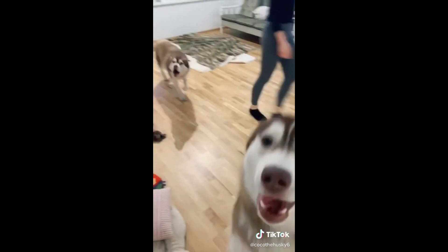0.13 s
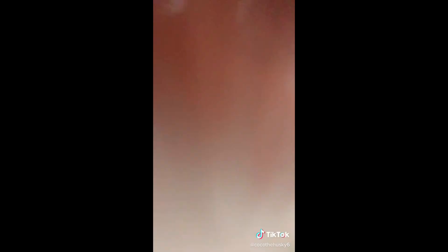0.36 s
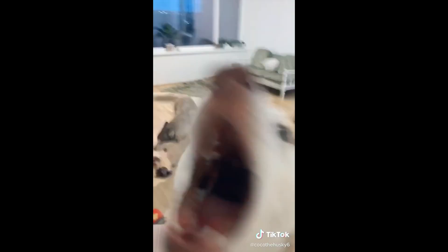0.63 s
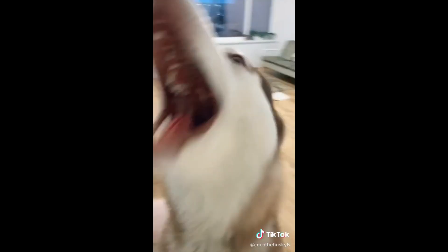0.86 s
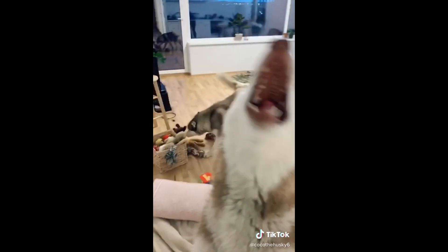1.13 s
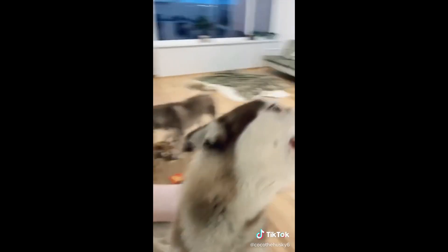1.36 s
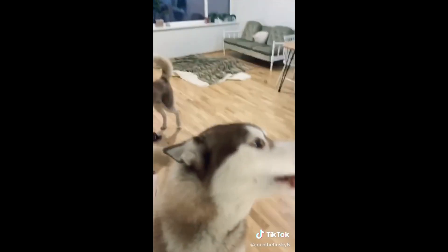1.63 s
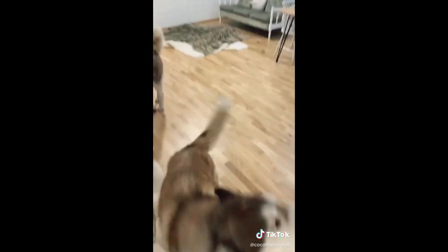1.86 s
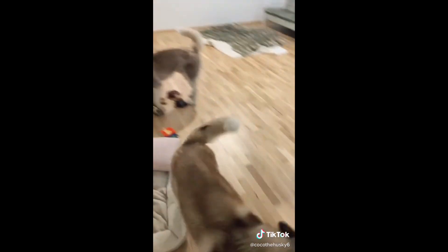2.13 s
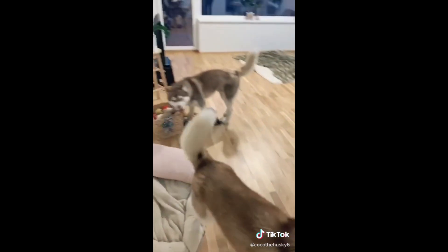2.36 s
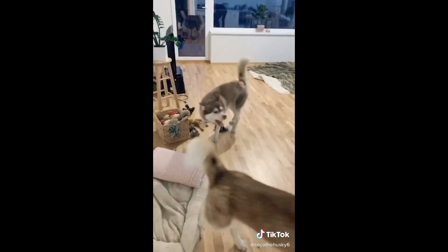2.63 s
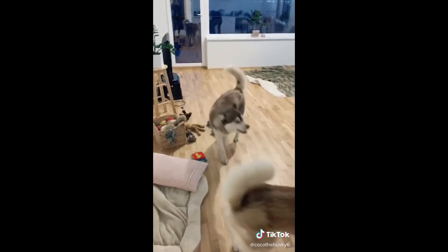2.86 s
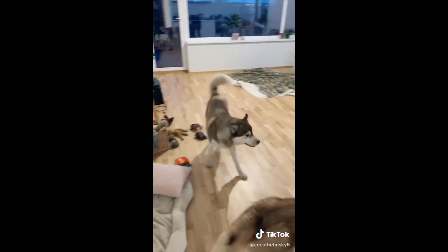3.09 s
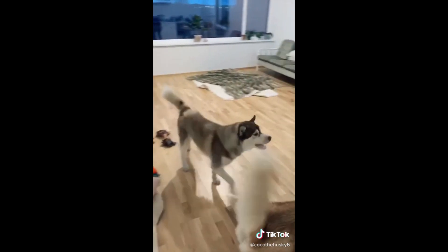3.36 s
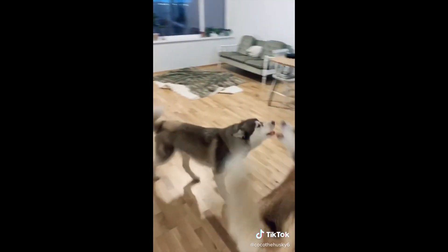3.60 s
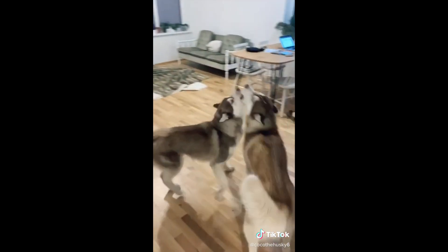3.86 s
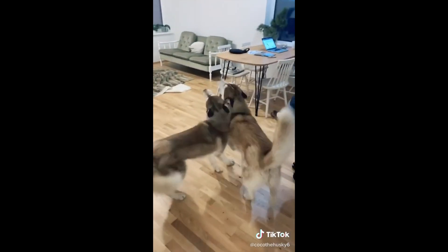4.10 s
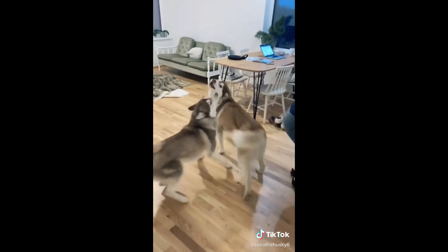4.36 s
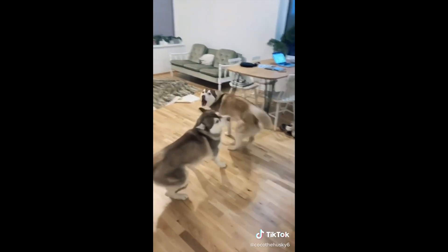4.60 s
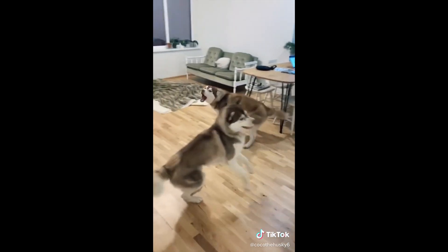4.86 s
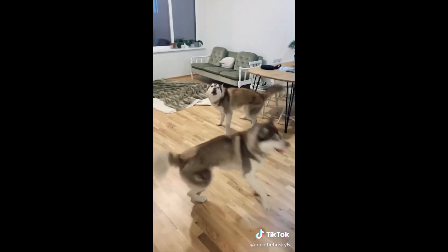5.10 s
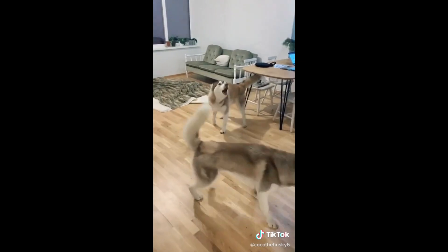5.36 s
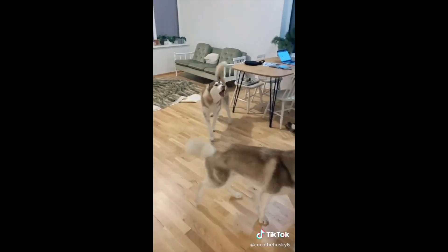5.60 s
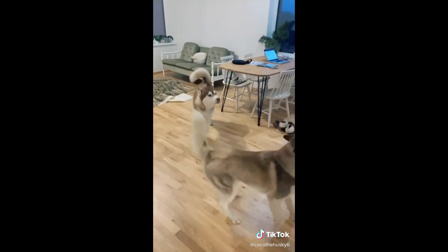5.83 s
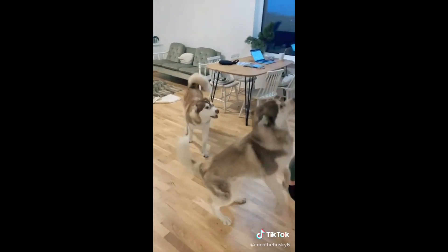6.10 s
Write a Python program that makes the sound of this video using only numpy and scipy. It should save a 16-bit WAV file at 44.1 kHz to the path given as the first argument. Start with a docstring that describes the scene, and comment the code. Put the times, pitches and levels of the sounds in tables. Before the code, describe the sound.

Excited huskies trade wavering howls and hoarse barks indoors; an early bark is close and distorted, the later calls farther and more echoing.

```python
"""Clean, wavering howls from huskies overlap in a living room; each is a stack of harmonics shaped by a moving mouth.
Under them runs a hoarse chorus of barks and growls: irregular pulses through throat resonances, with hissing breath.
An early close bark puffs on the phone's microphone ports and the loudest peaks clip; most later calls are farther.
The walls smear howls and barks with a decaying noise tail, and a faint rumble lies beneath."""
import sys
import numpy as np
from scipy import signal
from scipy.fft import rfft, irfft, next_fast_len
from scipy.io import wavfile
from scipy.ndimage import uniform_filter1d, map_coordinates

SR = 44100
rng = np.random.default_rng(int(sys.argv[2]) if len(sys.argv) > 2 else 0)


def unload_wav(signal):
    """Save mono or channel-first audio to the path in sys.argv[1] as 16-bit WAV at rate SR, clipped to [-1, 1]."""
    wavfile.write(
        sys.argv[1],
        SR,
        np.round(np.clip(np.atleast_2d(signal).T, -1, 1) * 32767).astype(np.int16),
    )


def linear_from_db(decibels):
    """Turn decibels (scalar or array-like) into linear amplitude factors; 0 gives 1."""
    return 10 ** (np.asarray(decibels, float) / 20)


N = 274302  # length in samples

ROOM_AT_1M_DB = -13  # the room's level against the direct sound at 1 m; it grows with distance


def unit(x):
    """Scaled to rms 1."""
    return x / np.sqrt(np.mean(x ** 2) + 1e-20)


def along(points, hz):
    """Interpolates (Hz, value) points on a log frequency axis."""
    f, v = np.transpose(points)
    return np.interp(np.log(hz + 1), np.log(f + 1), v)


def curves(rows):
    """One value per sample for each column after the time."""
    s, *cols = np.transpose(rows)
    return [np.interp(np.arange(N) / SR, s, c) for c in cols]


def gate(rows, fade_s=.014):
    """1 from the first to the last time of a table, with soft edges outside."""
    t = np.arange(N) / SR
    inside_s = np.minimum(t - rows[0][0], rows[-1][0] - t)
    return np.clip(inside_s / fade_s + 1, 0, 1)


def wobble(rate, size=N):
    """A smooth random curve, rate knots a second."""
    knots = rng.standard_normal(int(size * rate / SR) + 4)
    return map_coordinates(knots, [np.arange(size) * rate / SR], order=2)


def filtered(x, response):
    """x times a response of frequency, zero-padded so that the end does not wrap onto the start."""
    m = next_fast_len(N + SR // 2)
    return irfft(rfft(x, m) * response(np.fft.rfftfreq(m, 1 / SR)), m)[..., :N]


def noise(spectrum, alike):
    """Stereo coloured noise of rms 1; alike is the correlation of the two sides."""
    a, b = filtered(rng.standard_normal((2, N)), lambda hz: linear_from_db(along(spectrum, hz)))
    u = np.arccos(np.clip(alike, -1, 1)) / 2
    left = np.cos(u) * a + np.sin(u) * b
    right = np.cos(u) * a - np.sin(u) * b
    return unit(np.array([left, right]))


def burst(start_s, length_s, attack_s, sag_db_per_s, fade_db_per_s):
    """A quick rise, a sagging hold, then a fade."""
    t = np.maximum(np.arange(N) / SR - start_s, 0)
    loss_db = sag_db_per_s * np.minimum(t, length_s) + fade_db_per_s * np.maximum(t - length_s, 0)
    return np.minimum(t / max(attack_s, 1e-3), 1) ** 2 * linear_from_db(-loss_db)


def room(x):
    """A different decaying noise tail reaches each port; each frequency dies at its own speed."""
    # decay of the walls' reverberation: (frequency [Hz], time to fall 60 dB [s])
    decay = [(400, 0.9), (3000, 0.58), (1e4, 0.095)]
    hz, t, z = signal.stft(rng.standard_normal((2, SR * 3 // 4)), SR, nperseg=256)
    decayed = z * linear_from_db(-60 * t / along(decay, hz)[:, None])
    tail = signal.istft(decayed, SR, nperseg=256)[1]
    late = np.pad(x, (250, 0))[None]  # samples before the tail sets in
    return signal.fftconvolve(late, tail / np.linalg.norm(tail[0]), axes=1)[:, :N]


def placed(x, room_db):
    """Direct sound plus the room's answer, scaled to keep the overall level."""
    return (x + linear_from_db(room_db) * room(x)) / np.sqrt(1 + linear_from_db(2 * room_db))


def rumble():
    """Faint handling and house rumble: low noise whose level drifts and wavers."""
    # colour of the rumble: (frequency [Hz], relative density [dB per Hz])
    colour = [(50, -10.5), (200, -9.5), (400, -76.5)]
    # course of the rumble, before it wavers: (time [s], level [dB])
    course = [(0, -62), (1.5, -79), (2.1, -67.5), (5.5, -69.5), (5.9, -63.5)]
    level_db = curves(course)[0] + 2.6 * wobble(3.8)
    return linear_from_db(level_db) * noise(colour, alike=0.45)


def puff():
    """The near dog's breath strikes the microphone ports: one burst of lumpy low noise, nearly alike on both."""
    # colour of the gust: (frequency [Hz], relative density [dB per Hz])
    colour = [(20, -47.5), (45, -1), (145, -5), (260, -12), (450, -79.5)]
    blow = linear_from_db(-24.5) * burst(.22, .15, attack_s=.019, sag_db_per_s=21, fade_db_per_s=167.5)
    lumpy = noise(colour, alike=0.99) * linear_from_db(2.2 * wobble(50))
    return blow * unit(lumpy)


def folds(pulse_hz, drift):
    """Uneven vocal-fold pulses, with air escaping once a cycle."""
    jitter, scatter_db, airy = .028, 3, .12  # fast pitch share, pulse height spread, air against pulses
    cycles = np.cumsum(pulse_hz * (1 + drift * wobble(7) + jitter * wobble(80))) / SR
    starts = np.flatnonzero(np.diff(np.floor(cycles)))
    pulses = np.zeros(N)
    pulses[starts] = linear_from_db(scatter_db * rng.standard_normal(N)[:len(starts)])
    air = unit(np.exp(-3 * (cycles % 1)) * rng.standard_normal(N))
    return (unit(pulses - pulses.mean()) + airy * air) * linear_from_db(4.5 * wobble(18))


def hoarse():
    """Barks and growls: rough pulses and a second, wandering voice ring the throat; breath hisses on top."""
    # barks and growls: (start [s], hold [s], starting pitch [Hz], throat level [dB], breath level [dB], distance [m])
    barks = [(-.02, 0.071, 356, -16, -44.5, 1.1), (0.238, 0.08, 328.1, -5, -31, 0.71),
             (0.382, 0.033, 332.5, -41, -29, 0.71), (0.455, 0.061, 317.7, -21, -48, 0.93),
             (1.668, 0.13, 303.4, -26.5, -60.5, 3.05), (1.92, 0.11, 328.6, -30.5, -58.5, 2.3),
             (2.075, 0.19, 350.3, -22, -54.5, 4.1), (2.768, 0.49, 284.5, -31.5, -56, 0.63),
             (3.393, 0.092, 312.3, -17.5, -55, 3.69), (3.658, 0.38, 502.5, -23.5, -54, 1.73),
             (4.066, 0.15, 262.2, -19, -58.5, 1.8), (4.39, 0.27, 285, -26, -50, 1.3),
             (4.823, 0.15, 296.9, -19.5, -48.5, 2.75), (5.206, 0.33, 323.7, -32.5, -57, 2.4),
             (5.816, 0.08, 320.4, -21.5, -57.5, 1.83), (6.175, .1, 377.4, -24.5, -49.5, 1.9)]
    # resonances of the throat: (centre [Hz], width [Hz], relative level [dB])
    resonances = [(592, 1034, 7), (1186, 480, 9.5), (1550, 144, 9), (2420, 149, 5)]
    # colour of the breath: (frequency [Hz], relative density [dB per Hz])
    breath_colour = [(2500, -26), (4000, -8.5), (5300, -17.5), (6500, -9), (9500, -14.5), (11500, -22),
                     (14000, -48)]
    attack_s_per_m, sag_db_per_s = 0.0087, 18  # barks rise more slowly from afar
    throat_fade_db_per_s, breath_fade_db_per_s = 350.5, 112  # loss after the hold
    droop_per_s = .3  # the starting pitch is divided by one plus this for each second
    edge_db, edge_grows = -14.5, 0.79  # throat treble of a full-scale bark; dB lost per dB of softer effort

    def shapes(fade):
        return np.array([burst(s, length, attack_s_per_m * far, sag_db_per_s, fade)
                         for s, length, *_, far in barks])

    def tract(f):
        """Parallel resonances of alternating sign."""
        return sum((-1) ** k * linear_from_db(db) * 1j * f * w / (c * c - f * f + 1j * f * w)
                   for k, (c, w, db) in enumerate(resonances))

    def above(f, edge_hz):
        return 1 / (1 + (edge_hz / (f + 1)) ** 8)

    start_s, _, pitch_hz, throat_db, breath_db, distance_m = np.array(barks).T
    t = np.arange(N) / SR
    latest = np.searchsorted(start_s, t).clip(1) - 1  # the bark begun last
    latest_hz = pitch_hz[latest] / (1 + droop_per_s * (t - start_s[latest]))

    # farther barks give more of their level to the room
    wet = linear_from_db(ROOM_AT_1M_DB) * distance_m
    gains = linear_from_db(throat_db) * np.array([np.ones_like(wet), wet]) / np.hypot(1, wet)
    direct_gain, room_gain = np.sqrt(gains ** 2 @ shapes(throat_fade_db_per_s) ** 2)
    breath_power = linear_from_db(2 * breath_db) @ shapes(breath_fade_db_per_s) ** 2
    breath_gain = uniform_filter1d(np.sqrt(breath_power), size=SR // 40)

    voices = folds(latest_hz, drift=.065) + linear_from_db(-3) * folds(490, drift=.15)
    pulses = filtered(voices, lambda f: tract(f) * above(f, 304.0))
    body = unit(filtered(pulses, lambda f: 1 - above(f, 2385)))
    edge = unit(filtered(pulses, lambda f: above(f, 2100) * linear_from_db(along(breath_colour, f) / 2)))
    throat = body + linear_from_db(edge_db + edge_grows * throat_db[latest]) * edge
    breath = breath_gain * linear_from_db(1.8 * wobble(16)) * noise(breath_colour, alike=0.32)
    return direct_gain * throat + room(room_gain * throat) + breath


def howl(distance_m, rows):
    """A harmonic voice; the wider the mouth, the higher the overtone it lifts. Uneven pulses add lines halfway."""
    # colour of the voice, before resonance: (frequency [Hz], relative level [dB])
    colour = [(310, -34.5), (420, 4), (700, -6), (1600, -11.5), (2300, -8), (3000, -20.5), (4000, -27),
              (5300, -38.5), (7000, -31.5), (10000, -34.5), (13000, -73)]
    # spells when every second pulse is weak: (start [s], length [s], depth [dB])
    halving = [(0.484, 0.13, -10.5), (2.975, 0.13, -3), (3.815, 0.22, -13.5), (4.708, 0.17, 1.5)]
    jitter, rasp, flutter_db = .007, .002, 6  # slow and fast pitch shares at 1 m; flutter before its distance factor
    shut_hz, wide_hz, sharpness = 400, 2000, 4  # mouth resonance shut and wide open; centre over width
    pharynx_hz, pharynx_db = 1557, -8.5  # a second resonance that stays in place
    near_bright_db = 14  # treble gained for a tenth of the distance

    on = gate(rows)
    room_db = ROOM_AT_1M_DB + 20 * np.log10(distance_m)
    live = on > 0
    hz, level_db, opening = curves(rows)
    glide_hz = uniform_filter1d(hz, size=min(SR // 12, live.sum() // 12))
    waver = np.sqrt(distance_m) * (jitter * wobble(30) + rasp * wobble(160))
    hz = (glide_hz * (1 + waver))[live]

    k = np.arange(1, 26)[:, None]  # harmonic numbers
    mouth_hz = shut_hz * (wide_hz / shut_hz) ** opening[live]
    back = k * hz / pharynx_hz

    def ring(u):
        """Resonance at u times its centre frequency."""
        return 1 / (1 - u * u + 1j * u / sharpness)

    resonance = np.abs(ring(k * hz / mouth_hz) + linear_from_db(pharynx_db) * ring(back))
    lift = resonance * np.maximum(1, back ** 2 / 2)  # offsets the resonances' own treble loss
    distance_tilt_db = near_bright_db * np.log10(distance_m) * np.clip(back - 1, 0, 1)
    gain = linear_from_db(along(colour, k * hz) - distance_tilt_db) * lift
    gain = gain / np.linalg.norm(gain, axis=0) * linear_from_db(level_db[live])

    # a far dog turns its head among the echoes, so each overtone swells and fades alone
    swells = np.array([wobble(20, size=len(hz)) for _ in k])
    flutter = linear_from_db(flutter_db * np.tanh(np.sqrt(linear_from_db(room_db))) * swells)

    phase = 2 * np.pi * np.cumsum(hz) / SR
    voice = np.zeros(N)
    voice[live] = np.sqrt(2) * (gain * flutter * np.sin(k * phase + k * k)).sum(axis=0)
    depth = sum(linear_from_db(db) * gate([(s,), (s + length,)]) for s, length, db in halving)[live]
    halves = np.zeros(N)
    halves[live] = voice[live] * depth * np.cos(phase / 2)
    # the mouth radiates little of the lowest halfway line
    voice = voice + filtered(halves, lambda f: 1 / (1 + (shut_hz / (f + 1)) ** 4))
    return placed(voice * on, room_db)


def scene():
    """Rumble, puff, hoarse barks and all the howls in the room."""
    # howls: (distance [m], points), points: (time [s], pitch [Hz], level [dB], mouth opening [0-1])
    howls = [ (2.9, [(0, 597.7, -22, 0.55), (.13, 554.4, -24.5, 0.99), (.235, 608, -17, 0.49)]),
             (0.24, [(.246, 517.6, -6, 0), (.262, 568.2, -1.5, 0.44), (.3, 492, -12, 0.94),
             (.335, 542.6, -15.5, 0.1), (.375, 578, -6.5, 0.06), (.405, 548.5, -3.5, 0.07),
             (.43, 506.2, -8, 0.7), (.46, 494.3, -11.5, 0.58), (.495, 550.4, -11.5, 0.66)]),
             (0.78, [(.5, 555, -17.5, 0.56), (.6, 660.4, -10.5, 0.49), (.78, 725.3, -14.5, 0.75),
             (.86, 686, -13, 0.62), (.91, 625.1, -17, 0.15), (.97, 566.4, -21, 0.49),
             (1.2, 671, -24.5, 0.7), (1.43, 560.7, -31.5, 0.43)]), (2.2, [(.73, 509, -38.5, 0.45),
             (.88, 501.7, -35, 0.96), (1.06, 495, -51, 0.8)]), (1.7, [(1.69, 535, -29, 0.51),
             (1.79, 511.6, -19, 0.17), (1.845, 495, -26.5, 0.73), (1.95, 385.6, -33, 0.32),
             (2, 537.5, -17.5, 0.2), (2.1, 508, -27.5, 0.46)]), (2.16, [(2.2, 445.7, -27, 0.1),
             (2.3, 495, -18.5, 0.63), (2.46, 547.6, -19.5, 0.23), (2.65, 554.4, -16.5, 0.38),
             (2.73, 460.5, -22.5, 0.24), (2.9, 584.3, -26, 0.59), (3.12, 555.9, -26.5, 0.77),
             (3.19, 460.5, -33.5, 0.76), (3.3, 506, -43, 0.16)]), (1.98, [(2.17, 616, -29, 0),
             (2.25, 669.3, -20, 0.58), (2.35, 741, -25, 0.84), (2.62, 763.6, -19.5, 0.81),
             (2.765, 772.5, -27.5, 0.85), (2.82, 678, -21.5, 0.74)]), (2.9, [(3.42, 637.8, -26.5, 0.51),
             (3.66, 532.7, -26.5, 0.76), (3.79, 556.7, -16, 0.37), (4.25, 537.7, -30, 0.56)]),
             (3.5, [(3.93, 584.4, -24, 0.52), (4.09, 666.8, -20, 0.72), (4.2, 610, -34, 0.5),
             (4.28, 536.8, -22, 0.47), (4.38, 663, -23, 0.68), (4.47, 695.5, -21.5, 0.88)]),
             (2.49, [(4.47, 550, -21.5, 0.48), (4.63, 585, -24, 0.97), (4.69, 589.4, -14.5, 0.04),
             (4.715, 609, -26.5, 1), (4.92, 578.3, -27.5, 0.08), (5, 518, -21.5, 0.38),
             (5.1, 394, -26.5, 0.34), (5.2, 481, -27, 0.51), (5.3, 529.2, -17, 0.45),
             (5.4, 441.1, -32, 0.43), (5.52, 435, -29.5, 0.45), (5.6, 535.7, -19.5, 0.45),
             (5.81, 580.7, -41.5, 0.69)]), (2.17, [(5.795, 383.8, -33.5, 0.16), (5.83, 563, -21.5, 0.75),
             (5.87, 677, -21.5, 0.7), (5.96, 714.6, -41, 0.55)]), (4.8, [(6.175, 443, -46.5, 0.68),
             (6.21, 579.7, -17.5, 0.8)]), ]
    return rumble() + puff() + hoarse() + sum(howl(*call) for call in howls)


def band_limit(x):
    """A steep low-pass at the top of the band."""
    return signal.sosfilt(signal.butter(12, 15000, fs=SR, output="sos"), x)


def record(dry):
    """The right port hears five samples late, and the loudest peaks clip with a rounded knee."""
    ports = np.array([dry[0], np.roll(dry[1], 5)])
    clipped = ports / (1 + np.abs(ports) ** 8) ** (1 / 8)
    return band_limit(clipped)


dry = scene()
out = record(dry)
unload_wav(out)
```